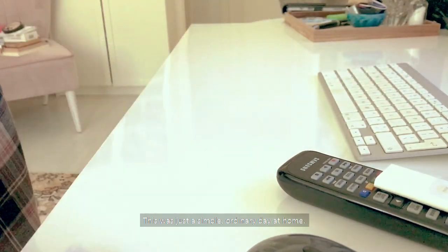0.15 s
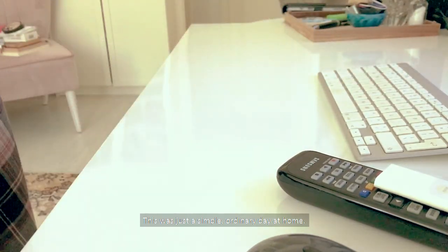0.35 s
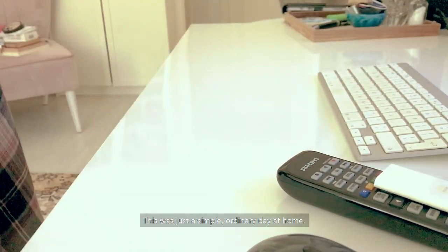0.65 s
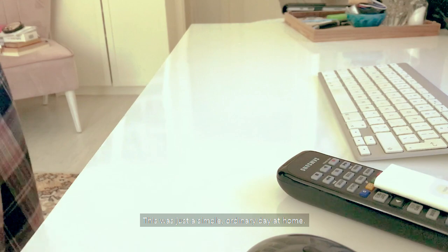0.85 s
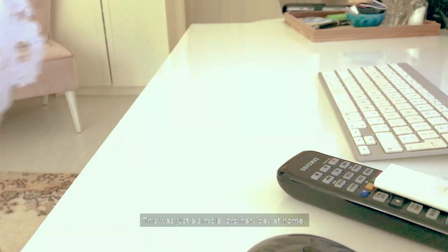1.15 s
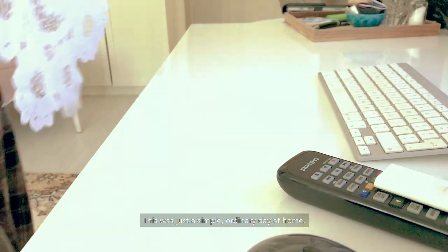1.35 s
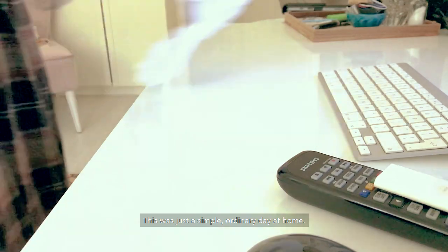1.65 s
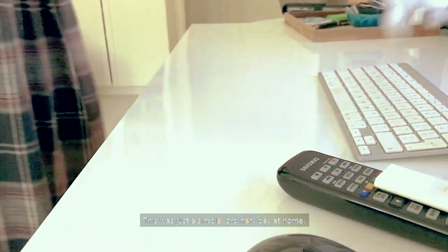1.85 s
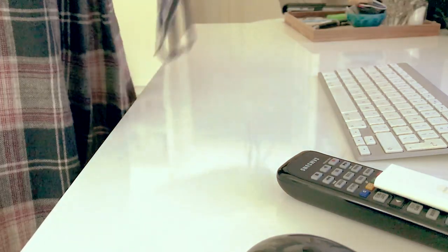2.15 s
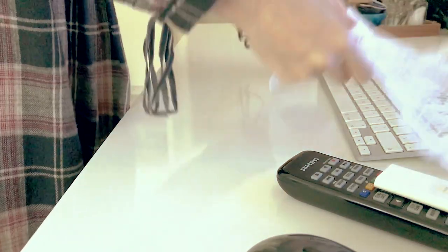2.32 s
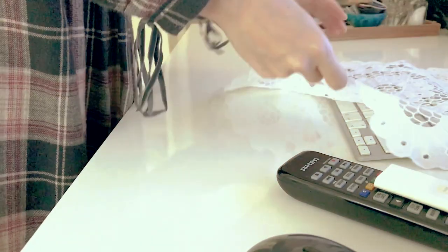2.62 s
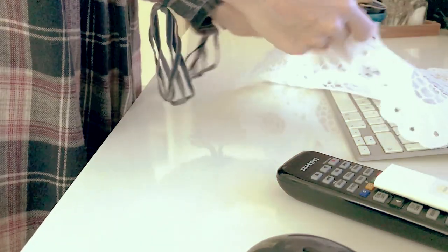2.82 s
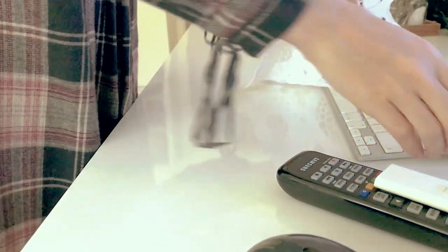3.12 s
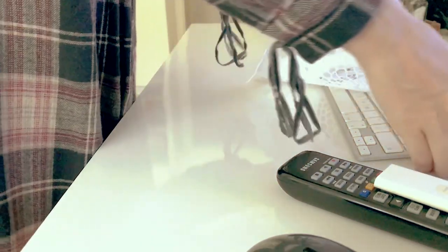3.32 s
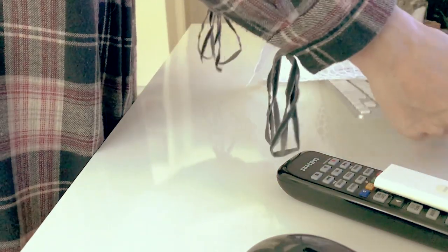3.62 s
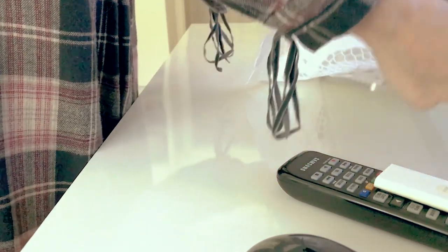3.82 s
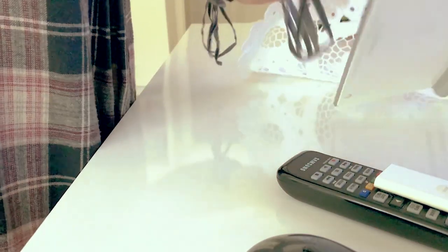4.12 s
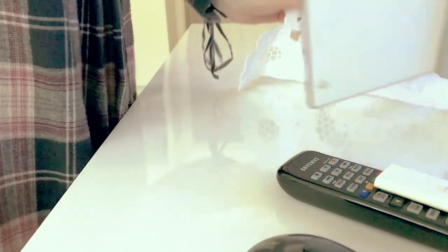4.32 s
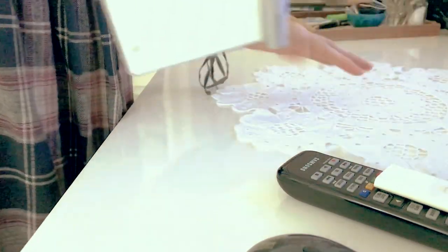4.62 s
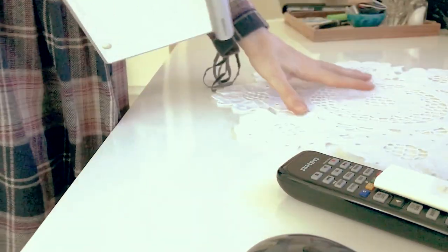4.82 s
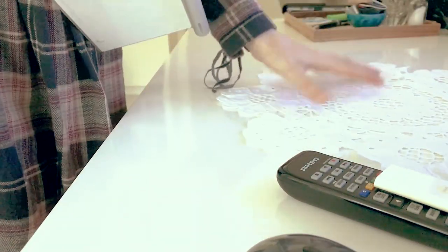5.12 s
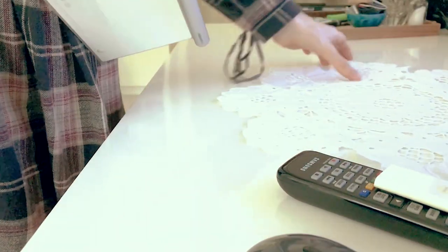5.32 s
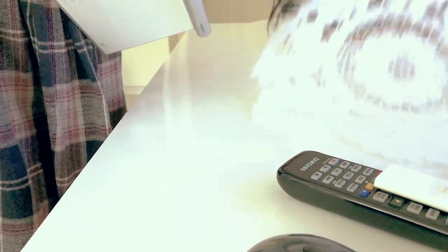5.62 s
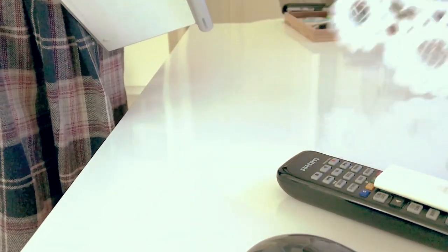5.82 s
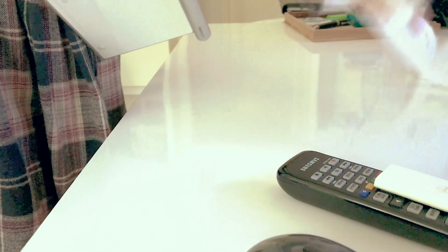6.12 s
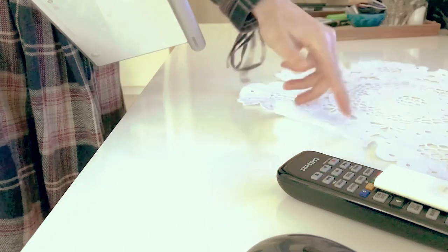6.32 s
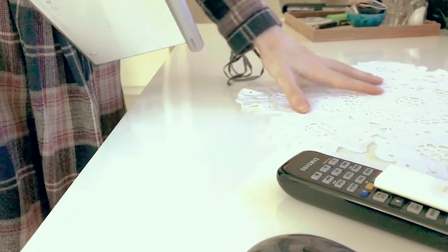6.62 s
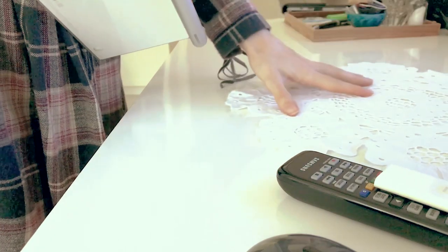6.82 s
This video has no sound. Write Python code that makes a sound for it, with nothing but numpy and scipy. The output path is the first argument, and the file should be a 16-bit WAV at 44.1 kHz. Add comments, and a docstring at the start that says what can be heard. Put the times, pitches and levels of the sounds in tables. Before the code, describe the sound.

Small birds chirp and whistle outside a quiet room while cloth swishes, a lace mat flops down, and a keyboard knocks and scrapes on a desk.

```python
"""A cloth swishes over a desk top in a small room while birds sing outside, over still air and a faint hum.
A lace mat flops down twice, a keyboard knocks and scrapes as it is lifted, and something is set down in bumps.
Rubbing is coloured grain noise that swells and fades; blows and taps are clicks, chatter and ringing modes.
Bird notes are gliding sines over a far chorus of blurred slurs; trees and walls echo the birds,
and the small room echoes the desk sounds."""
import sys
import numpy as np
from scipy import signal
from scipy.fft import rfft, irfft, next_fast_len
from scipy.io import wavfile

SR = 44100
rng = np.random.default_rng(int(sys.argv[2]) if len(sys.argv) > 2 else 0)


def output_pcm(signal):
    """Save a mono or channel-first signal as 16-bit PCM at the path in sys.argv[1].

    Samples are clipped to [-1, 1] before scaling.
    """
    pcm = np.clip(np.atleast_2d(signal).T, -1, 1) * 32767
    wavfile.write(sys.argv[1], SR, np.round(pcm).astype(np.int16))


N = 306495
TIME = np.arange(N) / SR  # seconds

# How long the small room's echoes last: (frequency [Hz], time to fall 60 dB [s])
ROOM_DECAY = [(60, 0.49), (300, 0.28), (1000, 0.3), (3000, 0.53), (7000, 0.3), (15000, 0.45)]
# How long the echoes off the trees last: (frequency [Hz], time to fall 60 dB [s])
TREE_DECAY = [(1500, 1.25), (3000, 1.37), (4500, 2.5), (8000, 2.84)]


def amp(db):
    """Turns decibels into gain."""
    return 10 ** (np.asarray(db) / 20)


def unit(x):
    """Scales a sound to rms 1."""
    return x / np.sqrt(np.mean(x ** 2) + 1e-20)


def read(points, hz):
    """Reads a frequency table along a logarithmic pitch axis."""
    f, value = np.transpose(points)
    return np.interp(np.log(hz + 1), np.log(f + 1), value)


def add(mix, s, sound):
    """Mixes a sound in at time s, in seconds."""
    part = mix[max(round(s * SR), 0):][:len(sound)]
    part += sound[:len(part)]


def drift(rate, size):
    """Random wander through knots of rms 1, with rate knots a second."""
    knots = rng.standard_normal(4000)
    return np.interp(np.arange(size) * rate / SR, np.arange(len(knots)), knots)


def tinted(x, colour):
    """Filters a sound by a colour table and levels it to rms 1."""
    size = next_fast_len(N)
    gain = amp(read(colour, np.fft.rfftfreq(size, 1 / SR)))
    return unit(irfft(rfft(x, size) * gain, size)[:N])


def swells(rows, roundness):
    """Gain of motions that swell and fade: roundness 1 is a sharp peak, 2 a smooth hump."""
    gain = np.zeros(N)
    for s, db, rise, fall in rows:
        away = np.maximum((s - TIME) / rise, (TIME - s) / fall)  # 1 is 20 dB below the peak
        near = away < 10
        gain[near] += amp(db - 20 * abs(away[near]) ** roundness)
    return gain


def tail(decay, rise, size=SR):
    """Dense echoes of energy 1 that build up over rise seconds; each band dies at its own speed."""
    hz, t, bands = signal.stft(rng.standard_normal(size), SR, nperseg=128)
    fade = amp(-60 * t / read(decay, hz)[:, None])
    echoes = signal.istft(bands * fade, SR, nperseg=128)[1][:size]
    echoes = echoes * (1 - np.exp(-np.arange(size) / SR / rise))
    return echoes / np.linalg.norm(echoes)


def through(x, response):
    """Convolves a sound with a response and cuts it to length."""
    return signal.oaconvolve(x, response)[:N]


def background():
    """Still air is coloured noise; the faint hum is steady sines whose phase wavers slightly."""
    # Hum partials: (frequency [Hz], rms level [dB])
    hum_partials = [(64.6, -81), (457.6, -75)]
    # Colour of still air: (frequency [Hz], relative level [dB])
    air_colour = [(15, -30), (25, -1), (59, -3.5), (130, -10), (190, -4.5), (373, -12), (451, -6.5),
                  (545, -15.5), (1370, -18.5), (2840, -12.5), (3520, -15.5), (4370, -10), (7510, -22),
                  (14800, -26), (16000, -25)]
    hum = np.zeros(N)
    for hz, db in hum_partials:
        wavering_phase = 2 * np.pi * hz * TIME + 0.054 * drift(5, N)
        hum += amp(db) * unit(np.sin(wavering_phase))
    air = tinted(rng.standard_normal(N), air_colour)
    return hum + amp(-65.5) * air


def syllable(length, pitches, buzz):
    """A nearly pure tone bends through three pitches, shaped by the beak; a buzz is a fast flutter."""
    # Resonance of a bird's throat and beak: (frequency [Hz], relative level [dB])
    beak = [(1400, -16), (3000, -4), (4500, 0.5), (8000, 1)]
    # The curve runs slightly past both end pitches, under the fades.
    u = np.linspace(-.06, 1.06, int(1.12 * max(length, .008) * SR))
    hz = np.polyval(np.polyfit([0, .5, 1], pitches, 2), u)
    flutter_hz = 150 * (1 + 0.15 * drift(130, len(u)))
    flutter = np.sin(2 * np.pi * np.cumsum(flutter_hz) / SR)
    hz = hz * (1 + buzz * flutter + 0.0063 * drift(241, len(u)))
    swell = signal.windows.tukey(len(u), .28) * amp(1.5 * drift(130, len(u)))
    tone = np.sin(2 * np.pi * np.cumsum(hz) / SR)
    return swell * unit(amp(read(beak, hz))) * tone


def chorus(count=330):
    """Many far birds: short random slurs, blurred by echo and swelling in bouts."""
    # Bouts of song: (peak time [s], relative level [dB], 20 dB rise [s], 20 dB fall [s])
    bouts = [(.05, -59.5, .3, 0.25), (1.22, -62, 0.19, 0.23), (2.1, -65, 0.41, 0.54),
             (3.1, -59.5, 0.88, 0.6), (4.6, -58.5, 0.59, 0.75), (6.9, -57.5, 1, .5)]
    # Colour of the blurred song: (frequency [Hz], relative level [dB])
    chorus_colour = [(1500, -37.5), (2300, -18), (3000, -12), (4300, -10.5), (5200, -20), (6500, -2),
                     (7600, 12), (10000, -42)]
    low_hz, high_hz = 2280, 5700  # range of middle pitch; slope and arch bend only the end pitches
    shortest_s, spread_s = 0.01494, 0.036
    slurs = np.zeros(N)
    for when, length, pitch, slope, arch, size, buzz in rng.random((count, 7)):
        bend = 0.291 * (slope - .5) * np.array([-1, 0, 1]) + 0.192 * (arch - .5) * np.array([1, 0, 1])
        hz = low_hz * (high_hz / low_hz) ** pitch * np.exp(bend)
        slur = syllable(shortest_s + spread_s * length, hz, 0.027 * buzz ** 2)
        add(slurs, when * N / SR, amp(-9 * size) * slur)
    echo = amp(3.5) * through(slurs, tail(TREE_DECAY, rise=0.016))
    return swells(bouts, roundness=5.6) * tinted(slurs + echo, chorus_colour)


def glide(hz, octaves):
    """Start, middle and end pitch of an even glide centred on hz."""
    return hz * 2 ** (octaves * np.array([-.5, 0, .5]))


def repeated(first, every, length, pitches, db, count):
    """The same note at an even pace."""
    return [(first + k * every, length, pitches, db) for k in range(count)]


def clear_notes():
    """Each kind of clear call bends its pitch in one shape; gives (s, length, three pitches, dB) per note."""
    # Level whistles: (time [s], length [s], pitch [Hz], relative level [dB])
    whistles = [(0, 0.022, 2970, -51), (.062, 0.083, 2861, -52), (0.209, 0.017, 3417, -46.5),
                (.557, 0.077, 2836, -50.5), (0.734, 0.017, 3397, -48), (2.479, 0.013, 5150, -40),
                (3.001, 0.086, 6600, -66), (3.6, 0.045, 2500, -49.5), (5.49, .087, 5000, -57),
                (5.652, 0.13, 3900, -51), (5.819, 0.027, 4710, -47.5), (5.848, .08, 4790, -57.5),
                (6.538, 0.058, 4900, -52), (6.906, 0.02, 1150, -59)]
    # The nearest bird's swoops: (time [s], relative level [dB])
    swoops = [(3.106, -41), (3.368, -42), (3.628, -40.5), (3.888, -40)]
    # A swoop dives, turns, climbs and levels off:
    # (delay [s], length [s], start [Hz], middle [Hz], end [Hz], relative level [dB])
    swoop_parts = [(0, .02, 3340, 2122, 1500, -4.5), (0.018, 0.017, 1520, 1390, 1688, -22),
                   (0.041, .024, 1686, 2695, 4220, -2), (0.059, .02, 3930, 4290, 4220, 0)]
    # Falling slurs: (time [s], length [s], start [Hz], drop [octaves], relative level [dB])
    falls = [(.925, 0.0129, 2190, 0.69, -56), (1.213, 0.01, 4560, .7, -58), (1.328, 0.011, 2385, 0.76, -52),
             (1.637, 0.0091, 5500, 0.43, -51.5), (1.793, 0.053, 5100, 0.43, -52.5),
             (1.869, 0.02, 2990, 0.79, -46), (2.051, 0.043, 5150, 0.26, -58),
             (2.233, 0.034, 3260, 0.69, -55), (2.871, 0.023, 2934, 0.84, -47),
             (4.44, 0.026, 5870, 0.19, -58.5), (4.5, .03, 5480, 0.23, -59),
             (4.547, 0.079, 5420, 1.39, -46.5), (4.704, 0.0183, 2760, 0.173, -49),
             (5.066, .034, 2804, 0.46, -55), (5.195, 0.029, 2955, 0.6, -58),
             (5.833, 0.018, 4700, 0.47, -50), (6.104, .03, 2770, .5, -54), (6.669, 0.052, 4630, 0.85, -56),
             (6.812, 0.023, 3350, 1.24, -43.5)]
    # Notes that drop and settle on a pitch: (time [s], length [s], end pitch [Hz], relative level [dB])
    landings = [(0.498, 0.068, 2770, -57.5), (2.462, 0.02, 5130, -48.5), (4.392, 0.018, 3310, -46),
                (4.472, 0.027, 3190, -49.5), (4.921, 0.0328, 3650, -51), (6.58, 0.036, 3400, -61.5)]
    # Rising notes that flatten: (time [s], length [s], end pitch [Hz], climb [octaves], relative level [dB])
    rises = [(1.51, 0.056, 3430, 0.29, -60), (1.715, 0.046, 3327, 0.083, -55),
             (1.913, 0.04, 3960, .13, -50), (2.998, 0.029, 4850, 0.55, -51),
             (3.031, 0.039, 3950, 0.3, -46.5), (3.2, 0.05, 3870, .26, -56),
             (3.353, 0.059, 3690, 0.34, -51.5), (4.027, .019, 5000, .19, -58),
             (4.25, 0.018, 4970, 0.092, -58), (4.296, 0.025, 5013, .12, -44),
             (4.735, 0.03, 3186, 0.57, -45.5), (5.135, .06, 2880, .38, -51.5)]
    # Quick upward zips: (time [s], end pitch [Hz], relative level [dB])
    zips = [(0.996, 6420, -57), (1.047, 6450, -55), (1.088, 8050, -58.5), (1.143, 8100, -55.5),
            (1.488, 8200, -58), (1.54, 7840, -55), (4.377, 5240, -51), (4.469, 5250, -53.5),
            (4.903, 5560, -50)]
    # Arched warbles: (time [s], length [s], top pitch [Hz], relative level [dB])
    arches = [(2.896, 0.028, 2540, -58.5), (3.655, .045, 3220, -55), (3.716, 0.04, 3090, -48),
              (4.894, 0.028, 2720, -54), (5.02, 0.07, 2920, -56.5), (5.175, 0.024, 3460, -56),
              (5.253, 0.074, 2700, -55), (6.052, 0.076, 2830, -58.5), (6.068, 0.092, 4400, -62.5),
              (6.176, 0.07, 2826, -54)]
    # Low two-note calls: (time [s], first pitch [Hz], relative level [dB])
    low_calls = [(1.717, 1543, -56.5), (2.726, 1474, -59)]
    # The two notes of a low call: (delay [s], length [s], pitch [ratio], relative level [dB])
    low_notes = [(0, .08, 1, 2.5), (.184, 0.045, 0.99, 1.5)]

    notes = []
    for s, db in swoops:
        for delay, length, *pitches, part_db in swoop_parts:
            notes.append((s + delay, length, pitches, db + part_db))
    for s, length, hz, drop, db in falls:
        notes.append((s, length, hz / 2 ** (drop * np.array([0, .5, 1])), db))
    for s, length, hz, db in landings:
        notes.append((s, length, hz * np.array([1.19, 1.03, 1]), db))
    for s, length, hz, climb, db in rises:
        # 0.21 of the climb is still to go at mid-note
        notes.append((s, length, hz / 2 ** (climb * np.array([1, 0.21, 0])), db))
    zip_s, zip_octaves = 0.01, 0.99
    for s, hz, db in zips:
        notes.append((s, zip_s, np.linspace(hz / 2 ** zip_octaves, hz, num=3), db))
    for s, length, hz, db in arches:
        notes.append((s, length, hz * np.array([.86, 1, .86]), db))
    for s, length, hz, db in whistles:
        notes.append((s, length, glide(hz, 0), db))
    for s, hz, db in low_calls:
        for delay, length, ratio, part_db in low_notes:
            notes.append((s + delay, length, glide(hz * ratio, -0.037), db + part_db))
    # One bird pipes a thin note at an even pace; there is also a short trill of falling notes.
    notes += repeated(first=.31, every=.404, length=.1, pitches=glide(4326, 0), db=-60.5, count=7)
    notes += repeated(first=3.226, every=.0265, length=.019, pitches=glide(2970, -.12), db=-47.5, count=4)
    return notes


def birds():
    """Birds over the far chorus; trees and walls echo them, a little differently on each side."""
    # Buzzy notes: (time [s], length [s], middle pitch [Hz], glide [octaves], relative level [dB])
    buzzes = [(0.62, 0.066, 5140, -.15, -61), (0.698, 0.084, 4470, -.16, -60),
              (0.811, .08, 5910, 0.15, -65), (2.105, 0.31, 7040, -0.099, -64),
              (2.22, 0.045, 4870, -.12, -59), (2.916, 0.061, 3650, 0, -58),
              (3.715, 0.08, 6610, -.08, -65.5), (4.956, 0.052, 4236, 0.32, -46.5),
              (5.074, 0.028, 4640, -0.5, -50.5), (5.198, 0.09, 5430, -0.21, -60.5),
              (5.333, .032, 7480, -0.23, -64), (5.682, 0.12, 3270, 0.39, -54),
              (5.981, 0.032, 3400, -0.15, -55.5), (6.18, 0.032, 7760, -0.035, -63.5),
              (6.558, .1, 1967, 0.082, -60), (6.721, 0.1, 3150, 0.52, -56)]
    buzzy_notes = [(s, length, glide(hz, octaves), db) for s, length, hz, octaves, db in buzzes]
    direct, sung = np.zeros(N), np.zeros(N)
    # Flutter depth is a share of the pitch.
    for notes, flutter_depth in ((clear_notes(), 0), (buzzy_notes, .028)):
        for s, length, pitches, db in notes:
            note = amp(db) * syllable(length, pitches, flutter_depth)
            far = np.clip((-54.0 - db) / 12, 0, 1)  # faint birds are farther off and heard more as echo
            add(direct, s, amp(-3 * far) * note)
            add(sung, s, amp(2.5 * far) * note)
    tree_echo = amp(-7.0) * through(sung, tail(TREE_DECAY, rise=0.0053))
    room_echo = amp(-3) * through(sung, tail(ROOM_DECAY, rise=0.001))
    width = amp(-15.0) * through(sung, tail(TREE_DECAY, rise=0.0037))
    middle = direct + tree_echo + room_echo + amp(-2.0) * chorus()
    return middle + np.array([width, -width])


def friction(colour, grains_per_s, spread_db, smooth):
    """Countless tiny slips of uneven size over a smooth hiss, at rms 1."""
    sizes = amp(spread_db * np.minimum(rng.exponential(1, N), 4)) * rng.standard_normal(N)
    slips = unit(sizes * (rng.random(N) < grains_per_s / SR))
    return tinted(slips + smooth * rng.standard_normal(N), colour)


def wiping():
    """Cloth slides with a fine, even hiss that grows brighter as it speeds up; shaken keys hiss alike."""
    # Swishes of the cloth: (peak time [s], relative speed [dB], 20 dB rise [s], 20 dB fall [s])
    swishes = [(.21, -49, 0.46, 0.5), (5.68, -61, 0.087, .07)]
    # Loose keys sizzle after the heaviest knock:
    # (peak time [s], relative speed [dB], 20 dB rise [s], 20 dB fall [s])
    key_sizzles = [(3.494, -47.5, 0.00086, 0.11)]
    # Colour of the hiss before it brightens: (frequency [Hz], relative level [dB])
    cloth_colour = [(180, -43.5), (300, -21.5), (455, -29), (713, -24), (1510, -11.5), (2030, -17.5),
                    (2790, -12), (3080, -12), (4830, -13.5), (5250, -11.5), (10200, -10), (12900, -4),
                    (16000, -11.5)]
    speed = swells(swishes, roundness=1.88) + swells(key_sizzles, roundness=0.64)
    hiss = friction(cloth_colour, grains_per_s=29000, spread_db=6, smooth=0.99)
    body = signal.sosfiltfilt(signal.butter(2, 9500, fs=SR, output="sos"), hiss)
    treble_gain = 1.19 * (speed / speed.max()) ** 1.14
    return amp(4.0) * speed * (body + treble_gain * (hiss - body))


def rustling():
    """A small rustle: sparse grains over a little hiss, in a sharp swell."""
    # Rustles: (peak time [s], level [dB], 20 dB rise [s], 20 dB fall [s])
    rustles = [(1.284, -47, 0.022, 0.074)]
    # Colour of the rustle: (frequency [Hz], relative level [dB])
    rustle_colour = [(500, -33), (1200, -28), (2500, -13.5), (3800, -18), (8000, -47)]
    grains = friction(rustle_colour, grains_per_s=1100, spread_db=0.5, smooth=0.36)
    return swells(rustles, roundness=0.82) * grains


def click(db):
    """A causal, minimum-phase click of energy 1 from a half spectrum in dB."""
    log_gain = np.log(amp(np.r_[db, db[-2:0:-1]]))
    pulse = np.fft.ifft(np.exp(np.conj(signal.hilbert(log_gain)))).real
    return pulse / np.linalg.norm(pulse)


def contact(db, chatter, panel_db, click_share):
    """A click, brief chatter between the surfaces (decay in seconds), and the short ring of the panel."""
    # How long the panel rings: (frequency [Hz], time to fall 60 dB [s])
    panel_decay = [(60, 0.14), (400, 0.15), (1500, 0.043), (3000, 0.016), (12000, 0.0053)]
    ring = amp(panel_db) * tail(panel_decay, rise=0.0041, size=8192)
    t = np.arange(len(ring)) / SR
    burst = rng.standard_normal(len(t)) * np.exp(-t / chatter)
    ring = ring + burst / np.linalg.norm(burst)
    ring[0] -= click_share
    return signal.fftconvolve(click(db), ring)


def desk_ring(lowest_hz, size=SR // 2):
    """The desk's modes swell as the blow spreads through the board; brief contacts hardly move the lowest."""
    # What the desk rings with: (frequency [Hz], relative level [dB], time to fall 60 dB [s])
    desk_modes = [(59.6, -2.5, 0.17), (136.8, 0.5, 0.27), (204, -17.5, 0.15), (287.2, -1.5, 0.069),
                  (331, -5.5, 0.18), (503.5, -7.5, 0.17), (598, 2.5, 0.029), (651, -28, 0.12),
                  (777, 1.5, 0.023), (1005, 1, 0.028), (1175, -31.5, 0.18), (1295, -17, 0.099)]
    t = np.arange(size) / SR
    ring = np.zeros(size)
    for hz, db, t60 in desk_modes:
        ring += amp(db - 60 * t / t60) * np.sin(2 * np.pi * (hz * t + rng.random()))
    ring = ring * (1 - np.exp(-t / 0.002))
    return signal.lfilter(*signal.butter(2, lowest_hz, "high", fs=SR), ring / np.linalg.norm(ring))


def taps():
    """Light touches: the mat's hem taps mostly brightly; keyboard clicks are duller, with more desk clack."""
    # Taps: (time [s], relative level [dB], brightness [dB per octave], share of the low clack [0-1])
    light_taps = [(1.2832, -34, -3, 0.1), (2.497, -13, 6, .74), (2.5148, -13.5, -3, 0.86),
                  (2.5218, 0, 0, 0.12), (2.675, -20, -5.5, .42), (3.331, -28.5, -12, 1),
                  (3.347, -12, -11.5, 0.67), (3.351, -17.5, 0, 0.7), (3.3694, -16, -12, 0.5),
                  (3.43, -18, -7.5, 1), (4.7197, -10, -1.5, .1), (6.3421, -6, 3, 0), (6.3455, 0, 0, 0),
                  (6.3461, -6.5, -3, 0.57), (6.378, -22, -6, 0.7), (6.4044, -12, -3.5, 0.25),
                  (6.4675, -12, -4.5, 0.25)]
    # Colour of a tap before its brightness: (frequency [Hz], relative level [dB])
    tap_colour = [(60, -41.5), (500, -28.5), (950, -6), (1400, 0), (1900, -5.5), (2500, 1.5), (3200, -3),
                  (4300, 2.5), (6000, -3.5), (8000, -4.5), (10500, -12), (16000, -21)]
    out, hz = np.zeros(N), np.fft.rfftfreq(2048, 1 / SR)
    for s, db, tilt, low in light_taps:
        colour = read(tap_colour, hz) + tilt * np.log2(1 + hz / 1000)
        add(out, s, amp(db - 2.5) * contact(colour, chatter=0.0021, panel_db=-9, click_share=0.34))
        add(out, s, amp(db) * low * desk_ring(lowest_hz=292))
    return out


def brushing():
    """The lace mat brushes the desk: coarse grains crackle as each motion swells and fades."""
    # Brushes of the mat: (peak time [s], level [dB], 20 dB rise [s], 20 dB fall [s])
    brushes = [(2.26, -67.5, 0.14, .08), (2.518, -29.5, 0.028, 0.019), (2.67, -54.5, 0.11, 0.053),
               (4.64, -58, 0.037, 0.11), (6.26, -50, 0.023, 0.043), (6.346, -33, 0.025, 0.016),
               (6.385, -44, 0.037, 0.14), (6.522, -48, .012, 0.027)]
    # Colour of the lace: (frequency [Hz], relative level [dB])
    lace_colour = [(59, -44), (100, -46), (452, -1), (950, 10.5), (2000, 1.5), (2370, 9), (2930, -4),
                   (4020, 3), (4770, -18), (5190, 7), (6560, -7.5), (11600, -13), (16000, -40)]
    crackle = friction(lace_colour, grains_per_s=1500, spread_db=3, smooth=.3)
    return swells(brushes, roundness=1.3) * crackle


def knocks():
    """Each heavy blow cracks at the contact and sets the desk ringing; hardness sets its colour."""
    # Blows: (time [s], relative contact level [dB], relative thud level [dB], hardness [0-1])
    blows = [(3.4746, -13, -11, 0.43), (3.4923, 4, 6, 0.4), (4.103, -5, -14.5, 0.16),
             (4.132, -17, -36.5, 0.34), (5.408, -22, -14, 0.7), (5.4215, -5.5, -12, 0.75),
             (5.431, -1, -8, 0.74), (5.4995, -7, -13.5, 0.73), (5.593, -6, -10, 1)]
    # Colour of a soft blow: (frequency [Hz], relative level [dB])
    dull_colour = [(40, -22), (100, -15), (400, 1.5), (900, 4), (1400, 2), (2200, 6), (2900, -8),
                   (3800, -12), (5300, -7), (6800, -25), (13000, -33), (16000, -29)]
    # Colour of a hard blow: (frequency [Hz], relative level [dB])
    hard_colour = [(40, -16), (70, -0.5), (220, 4.5), (500, 0), (1000, -5), (1450, 0.5), (2100, -9.5),
                   (3200, -1), (5300, -8), (6700, -9), (8100, -25.5), (12700, -28.5), (16000, -38.5)]
    out, hz = np.zeros(N), np.fft.rfftfreq(2048, 1 / SR)
    for s, contact_db, thud_db, hard in blows:
        hard = np.clip(hard, 0, 1)
        colour = (1 - hard) * read(dull_colour, hz) + hard * read(hard_colour, hz)
        crack = contact(colour, chatter=0.0013, panel_db=-7.5, click_share=0.35)
        add(out, s, amp(contact_db - 1) * crack)
        add(out, s, amp(thud_db + 4.5) * desk_ring(lowest_hz=25 + 215 * hard))
    return out


def dragging():
    """The keyboard's edge scrapes over the desk: dense grains and hiss in a low, uneven colour."""
    # Drags of the edge: (peak time [s], level [dB], 20 dB rise [s], 20 dB fall [s])
    drags = [(4.085, -31.5, 0.14, 0.026), (4.138, -52, .015, 0.016)]
    # Colour of the scrape: (frequency [Hz], relative level [dB])
    scrape_colour = [(35, -74.5), (60, -50), (145, -10.5), (195, -24), (294, -1), (414, -17.5), (529, -7.5),
                     (634, -8.5), (823, -9.5), (1120, -18), (1220, -19), (1320, -13), (1660, -20),
                     (1840, -25), (3000, -44), (3900, -76), (6600, -120)]
    scrape = friction(scrape_colour, grains_per_s=2500, spread_db=-1.5, smooth=0.93)
    return swells(drags, roundness=1.97) * scrape


def scene():
    """Desk sounds with their small room, birds and background."""
    desk = wiping() + rustling() + taps() + brushing() + knocks() + dragging()
    room_echo = amp(-7.0) * through(desk, tail(ROOM_DECAY, rise=0.0011))
    return desk + room_echo + birds() + background()


def record(dry):
    """The microphone loses the deepest bass; then the recorder's band limit cuts the top."""
    dry = signal.lfilter(*signal.butter(4, 36, "high", fs=SR), dry)
    band_limit = signal.firwin(511, 16050, window=("kaiser", 9), fs=SR)  # cutoff in Hz
    return signal.oaconvolve(dry, band_limit[None], "same")


dry = scene()
out = record(dry)
output_pcm(out)
```